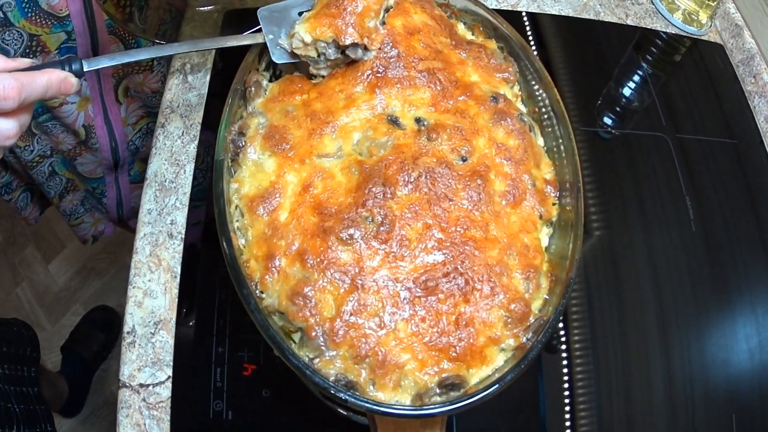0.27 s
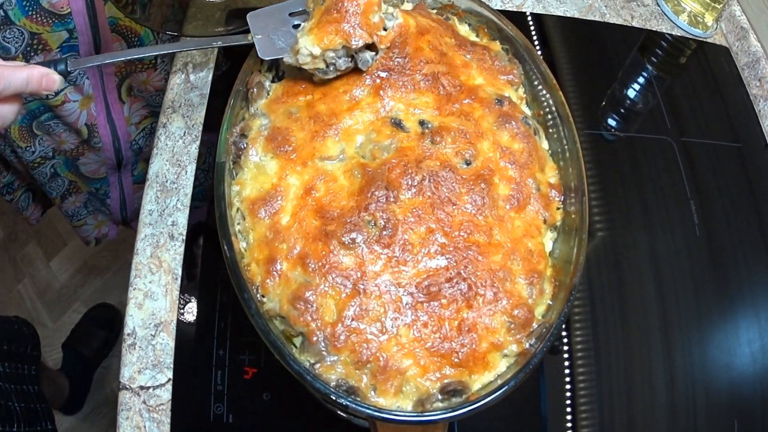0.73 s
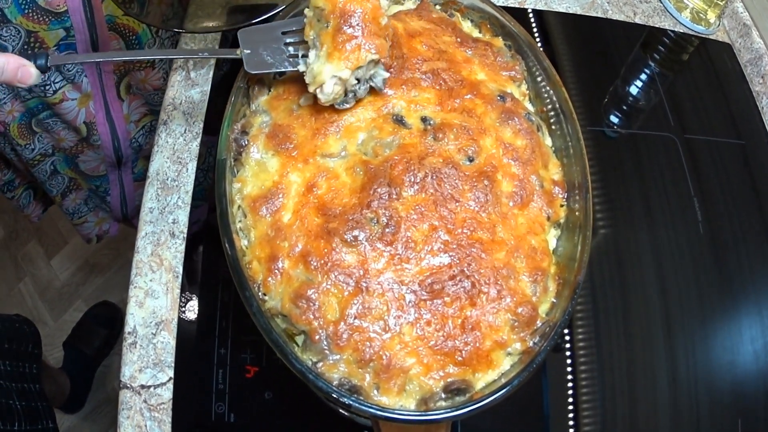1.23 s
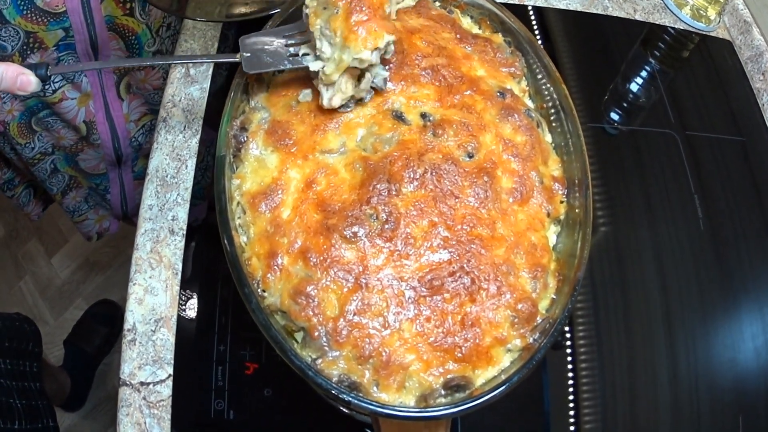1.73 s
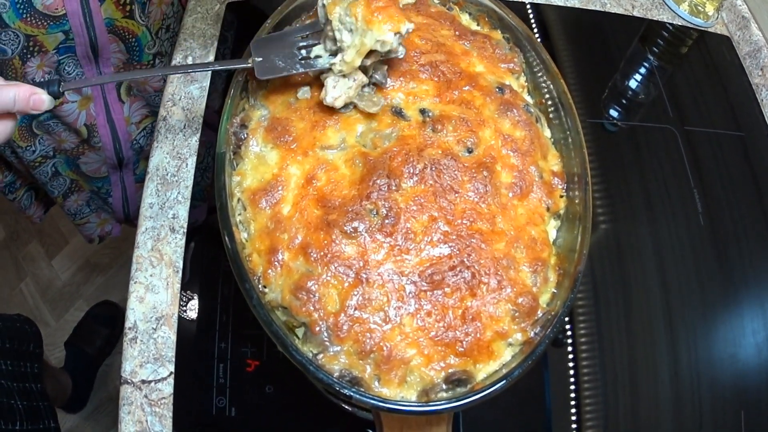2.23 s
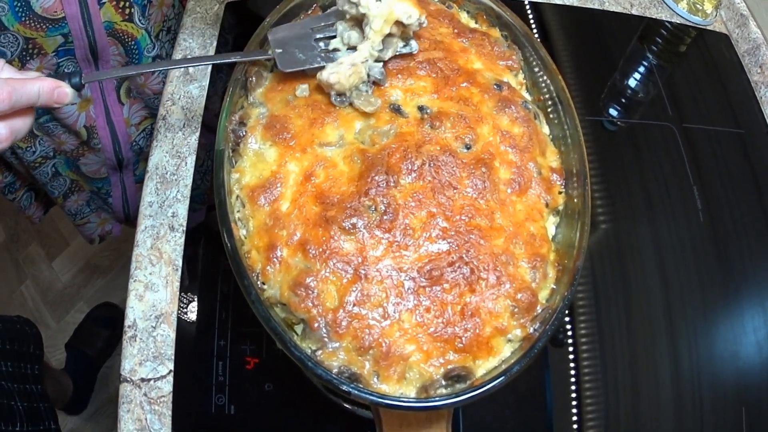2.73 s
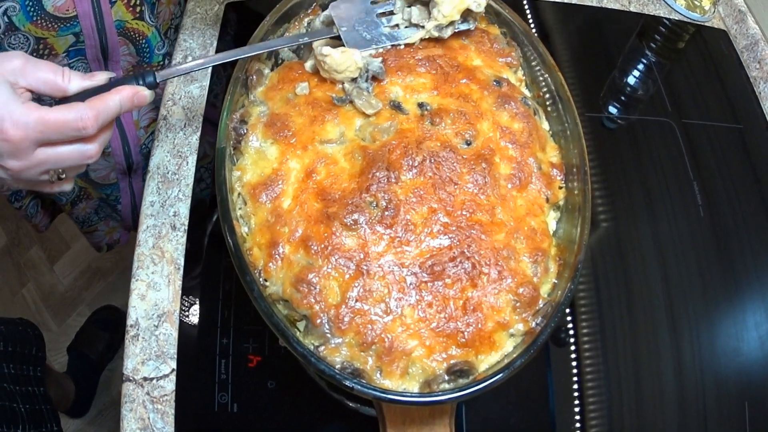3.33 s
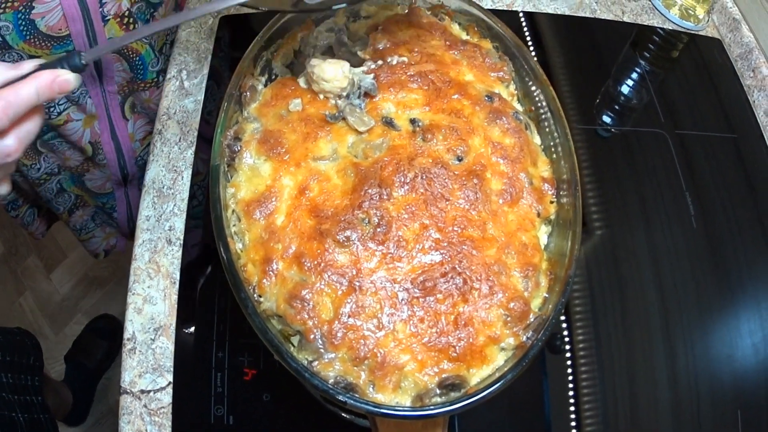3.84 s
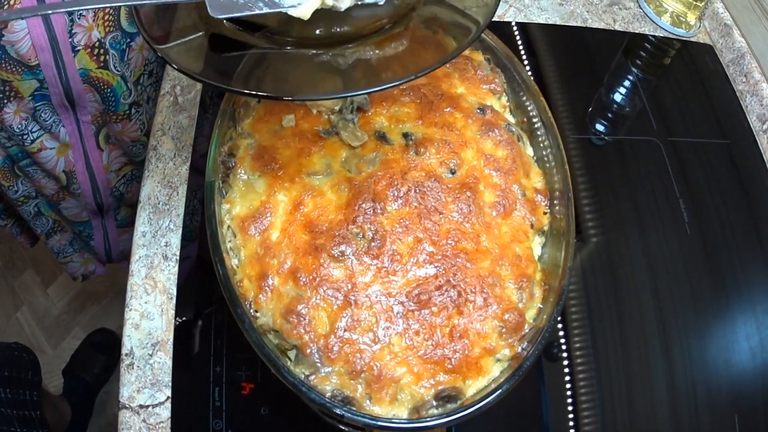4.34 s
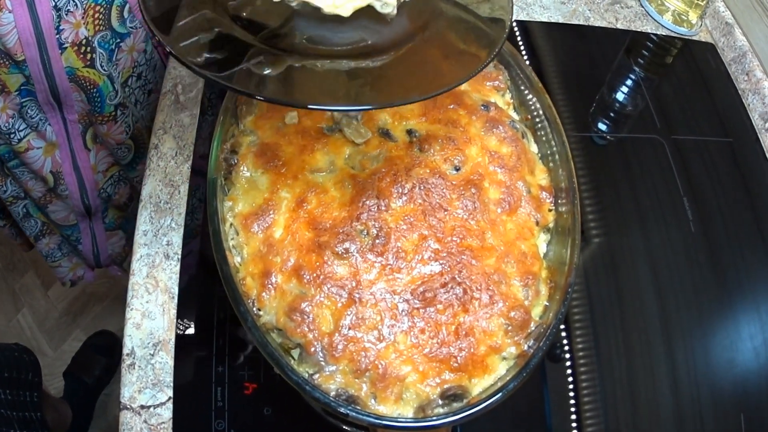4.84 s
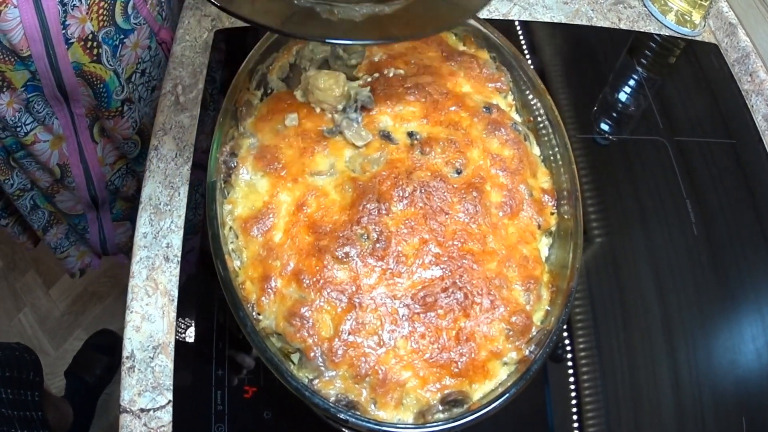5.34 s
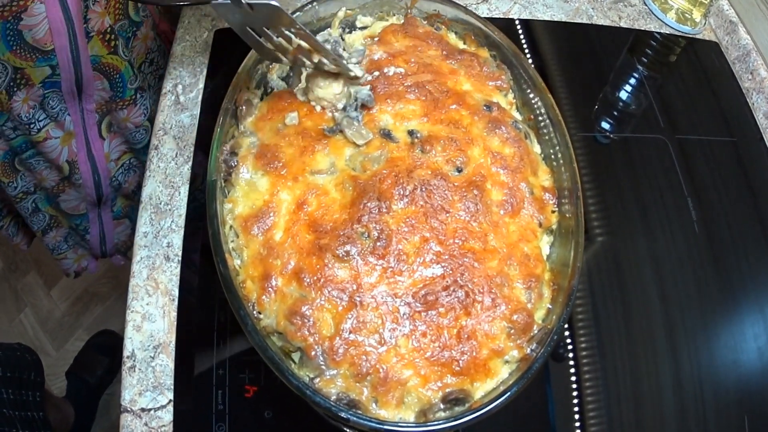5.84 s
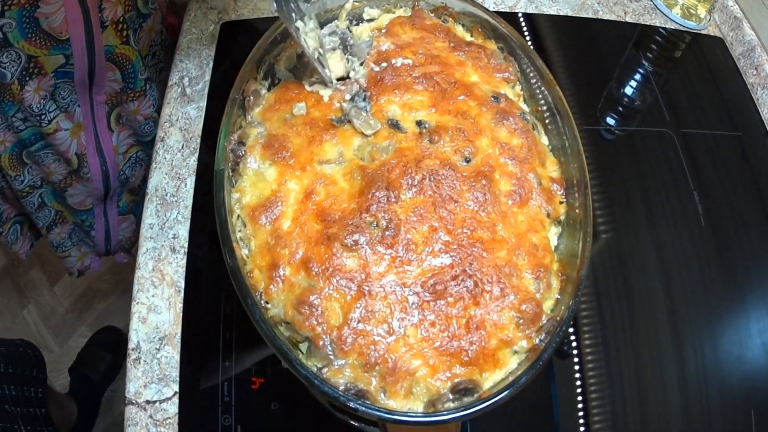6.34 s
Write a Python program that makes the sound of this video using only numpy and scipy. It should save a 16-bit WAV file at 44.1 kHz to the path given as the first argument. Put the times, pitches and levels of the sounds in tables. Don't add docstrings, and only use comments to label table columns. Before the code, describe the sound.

A metal spatula clinks, drops hard and scrapes in a glass baking dish, with tiny crust ticks, faint squeaks and late plate clinks in a kitchen.

```python
import sys
import numpy as np
from scipy import signal
from scipy.fft import rfft, irfft, next_fast_len
from scipy.io import wavfile
from scipy.ndimage import map_coordinates

SR = 44100
rng = np.random.default_rng(int(sys.argv[2]) if len(sys.argv) > 2 else 0)


def magnitude_from_level(level_db):
    exponent = np.asarray(level_db, float) / 20
    return 10 ** exponent


def unload_wav(signal):
    wavfile.write(
        sys.argv[1],
        SR,
        np.round(np.clip(np.atleast_2d(signal).T, -1, 1) * 32767).astype(np.int16),
    )


N = 290178
LENGTH = SR // 3
HARD_HZ, HEAVY_HZ = 2585, 1000


def unit(x):
    return x / np.sqrt(np.mean(x ** 2) + 1e-20)


def along(points, hz):
    f, v = np.transpose(sorted(points))
    return np.interp(np.log(hz + 1), np.log(f + 1), v)


def curve(rows):
    s, value = np.transpose(rows)
    return np.interp(np.arange(N) / SR, s, value)


def filtered(x, response):
    m = next_fast_len(x.shape[-1] + 8192)
    spectrum = rfft(x, m) * response(np.fft.rfftfreq(m, 1 / SR))
    return irfft(spectrum, m)[..., :x.shape[-1]]


def diffuse(pair, alike):
    def turn(hz):
        return np.arccos(np.clip(along(alike, hz), -1, 1)) / 2
    mid, side = filtered(pair, lambda hz: np.array([np.cos(turn(hz)), np.sin(turn(hz))]))
    return np.array([mid + side, mid - side])


# (frequency [Hz], phase [radians])
LEFT_LEAD = [(200, -.9), (400, -1), (2300, -.75), (3400, -.1), (6000, -.3), (11000, -.5)]
# (frequency [Hz], right over left [dB])
RIGHT_LOUDER = [(250, -1.3), (1000, 1), (2500, 3), (5000, 2.28), (9000, 0.3)]


def direct(x):
    def ports(hz):
        phase = [[.5j], [-.5j]] * along(LEFT_LEAD, hz)
        level_db = [[-.5], [.5]] * along(RIGHT_LOUDER, hz)
        return np.exp(phase) * magnitude_from_level(level_db)
    return filtered(x, ports)


# (frequency [Hz], time to fade 60 dB [s])
KITCHEN_FADE = [(200, 0.38), (1000, 0.37), (4000, 0.36), (10000, 0.19)]
# (frequency [Hz], left-right likeness [-1 to 1])
WALL_LIKENESS = [(200, 0.99), (1000, 0.55), (4000, .6), (10000, 0.43)]


def room(x):
    noise = rng.standard_normal((2, min(len(x), LENGTH)))
    hz, t, z = signal.stft(noise, SR, nperseg=256)
    fading = z * magnitude_from_level(-60 * t / along(KITCHEN_FADE, hz)[:, None])
    tail = diffuse(signal.istft(fading, SR, nperseg=256)[1], WALL_LIKENESS)
    late = np.pad(x, (130, 0))[None]
    return signal.fftconvolve(late, tail / np.linalg.norm(tail[0]), axes=1)[:, :len(x)]


def add(track, s, sound):
    part = track[:, round(s * SR):][:, :sound.shape[1]]
    part += sound[:, :part.shape[1]]


def strike(modes, colour, held_s, free_db, crack_db, wash_db, room_db, rise_s, sag=0, sag_s=0.0016, loose=1, hold=1):
    t = np.arange(LENGTH) / SR
    hz, db, t60 = np.transpose(modes)[:, :, None]

    fade = magnitude_from_level(-60 * (t / held_s) ** hold) + magnitude_from_level(free_db - 60 * t / t60)
    scatter_db = rng.normal(0, 1.3, hz.shape)
    strength = magnitude_from_level(db + along(colour, hz) + scatter_db)
    wander = np.cumsum(rng.standard_normal((len(modes), LENGTH)), axis=1)
    drift = 0.034 * np.sqrt(hz / 3000) * wander
    bent_t = t + sag * sag_s * (1 - np.exp(-t / sag_s))
    phase = 2 * np.pi * (hz * bent_t + loose * rng.random(hz.shape)) + drift
    ring = np.sum(strength * fade * np.sin(phase), axis=0)

    def clusters(f):
        return magnitude_from_level(-7) + np.sum(magnitude_from_level(db) / (1 + ((f - hz) / 55.27) ** 2), axis=0)
    noise = rng.standard_normal(LENGTH)
    crack = noise * magnitude_from_level(crack_db - 60 * t / (0.48 * held_s))
    wash = filtered(noise, clusters) * magnitude_from_level(wash_db + 4.5 - 60 * t / 0.23)
    (low_hz, low_db), high_db = colour[0], colour[-1][1]
    edges = [(120, -120), (0.96 * low_hz, low_db - 20), (12000, high_db - 18)]
    rough = filtered(crack + wash, lambda f: magnitude_from_level(along(colour + edges, f)) / (1 + f / 4000))

    blow = (ring + rough) * (1 - np.exp(-(t / rise_s) ** 2))
    return direct(blow) + magnitude_from_level(room_db) * room(blow)


# (frequency [Hz], level [dB per Hz])
HISS_COLOUR = [(15, -68), (25, -45), (353, -3), (391, -4.5), (545, -1.5), (603, -1.5), (907, -0.5),
               (1030, -2.5), (1140, -1), (2050, -6.5), (2510, -8.5), (3770, -13), (11000, -19),
               (15700, -24.5), (22000, -120)]
# (frequency [Hz], left-right likeness [-1 to 1])
HISS_LIKENESS = [(60, 0.4), (200, -0.46), (700, -0.75), (1400, -0.71), (2700, -.45), (3800, 0.16),
                 (7000, 0.18), (11000, 0.86)]


def hiss():
    noise = filtered(rng.standard_normal((2, N)), lambda hz: magnitude_from_level(along(HISS_COLOUR, hz)))
    return magnitude_from_level(-59 + 5.0) * unit(diffuse(noise, HISS_LIKENESS))


def camera_jolt():
    u = np.arange(N) / SR / .002
    return magnitude_from_level(-42 + np.array([[-5], [3]])) * u * np.exp(1 - u)


# (frequency [Hz], level [dB], time to fade 60 dB [s])
DISH_MODES = [(502, 16, 0.2), (700, -12.5, .08), (910, 0, .1), (1124, -2, .25), (1250, -5, .2),
              (1460, -10, .25), (1690, -1.5, 0.099), (1768, -5, .2), (2010, -11, .2), (2180, -14.5, .2),
              (2365, -6, .1), (2550, -3, .3), (2590, 2, 0.3), (2930, -13, .2), (3386, -6, .2),
              (3473, 0.5, .2), (3585, -13, .25), (3860, -13.5, .2), (4250, -12, .2), (4372, -6, .2),
              (4490, -3, .14), (4560, -0.5, 0.15), (4700, -8, .15), (5060, -14, .2), (5630, -5, 0.3),
              (5700, 0, 0.36), (6525, -7, .25), (6990, 0, 0.35), (7770, -7, 0.15), (8430, -6, 0.2),
              (9380, -12, .12), (10150, -13, 0.076)]
# (time [s], level [dB], spot [0 lip, 1 rim, 2 wall, 3 floor],
# hardness [dB per octave above HARD_HZ], weight [dB below HEAVY_HZ])
CLINK_EVENTS = [(0.0017, -12.5, 0.59, 2, -9), (0.032, -33.5, .8, 3, -7.5), (0.3007, -30.5, 1.14, -4, -6),
                (0.3605, -51.5, 1.95, -1, 16), (0.616, -44.5, 1, 2, -2.5), (0.639, -25, 0.068, -0.3, -5),
                (0.8117, -34, 0.037, -13.5, 0), (0.895, -51.5, 1.44, -11, -5.5),
                (2.5691, -34, 2.28, -1.5, 14.5), (2.674, -42.5, 2.4, -7.5, 2.5), (2.8279, -44, 1.52, 2, 0),
                (3.2977, -60.5, 1.66, 5.5, 10), (6.177, -18, 2.6, 5.5, -12)]
FAMILY_HZ = [515, 910, 1120, 1690, 1770, 2585, 3386, 3473, 4380, 4560, 5680, 6490, 7000, 8400]
LIP_STRIKE = [-29.5, -5.5, -10.5, -10.5, 2, -15, -8.5, -9, -6, -6, -3, -9.5, -11, -8.5]
RIM_STRIKE = [-16, -4, -4.5, 0, -1.5, -7, -1.5, -4, 2.5, 1.5, -6.5, -14, -15.5, -14]
WALL_STRIKE = [-41, -10.5, 5, 3, -0.5, -10.5, -4, -4, -12, -13.5, -15.5, -32, -17, -35]
FLOOR_STRIKE = [-24.5, -37, -14, -15, -9.5, -13, 1, -5.5, -11, -11.5, -24, -19.5, -39, -26.5]


def clinks():
    out, hz = np.zeros((2, N)), np.array(FAMILY_HZ)
    families = list(zip(LIP_STRIKE, RIM_STRIKE, WALL_STRIKE, FLOOR_STRIKE))
    for s, db, spot, hardness, weight_db in CLINK_EVENTS:
        def at_spot(values):
            return np.interp(spot, range(4), values)
        struck_db = np.array([at_spot(family) for family in families])
        struck_db = struck_db + hardness * np.log2(np.maximum(hz / HARD_HZ, 1))
        struck_db = struck_db + weight_db * (hz < HEAVY_HZ)
        clink = strike(DISH_MODES, list(zip(hz, db + struck_db)), held_s=0.04,
                       free_db=at_spot([-26.5, -26, -20, -23.5]), crack_db=14,
                       wash_db=at_spot([-5, 0, -0.5, -5.5]), room_db=-11.5, rise_s=0.00088, hold=1.15)
        add(out, s, magnitude_from_level(5.0) * clink)
    return out


# (time [s], peak level [dB], frequency [Hz])
THREAD_SNAPS = [(0.132, -25, 3110), (.466, -43, 9470), (.489, -39, 3260), (0.495, -42.5, 5930),
                (0.783, -47, 7600), (.84, -42.5, 9500), (0.88, -42.5, 8900), (0.93, -37.5, 3150),
                (.97, -38, 3130), (.98, -42.5, 9600), (1.458, -49, 4000), (1.854, -35, 2930),
                (1.87, -24, 6400), (1.874, -35, 5900), (1.878, -45, 5900), (2.05, -43.5, 7900),
                (2.593, -44, 9600), (2.814, -40.5, 6440), (2.829, -28.5, 6260), (3.147, -40, 9100),
                (3.792, -44, 7900), (6.324, -51, 6490), (6.354, -43, 7800), (6.475, -43.5, 4860)]
# (time [s], peak level [dB], frequency [Hz])
CRUST_CRACKS = [(0.529, -41.5, 6790), (0.901, -40, 3240), (0.962, -44, 6400), (.998, -37, 5680),
                (1.01, -40, 8520), (1.12, -35, 2190), (1.126, -38.5, 4480), (1.212, -40.5, 3940),
                (1.22, -44, 3800), (1.316, -44, 3450), (1.32, -45.5, 9000), (1.696, -39.5, 4500),
                (1.8673, -28, 7600), (2.777, -42, 3500), (2.945, -54.5, 3020), (3.041, -44.5, 3500),
                (2.207, -41, 8480), (2.546, -33, 7000), (2.829, -59, 7500), (3.158, -44.5, 6000),
                (3.28, -42, 3670), (3.299, -43.5, 1450), (4.464, -43, 2900), (4.578, -38, 4230),
                (5.605, -42, 6460), (6.068, -44, 8500), (6.433, -47, 8540), (6.487, -38, 7670),
                (6.531, -46, 4650)]


def food_ticks():
    out, t = np.zeros((2, N)), np.arange(SR // 8) / SR
    for breaks, octaves in [(THREAD_SNAPS, 0.21), (CRUST_CRACKS, 0.48)]:
        for s, db, hz in breaks:
            burst = rng.standard_normal(len(t)) * magnitude_from_level(-60 * t / .007)
            band = filtered(burst, lambda f: np.exp(-(np.log2((f + 1) / hz) / octaves) ** 2 / 2))
            snap = magnitude_from_level(db) * band / np.abs(band).max()
            add(out, s, direct(snap) + magnitude_from_level(-7.5) * room(snap))
    return out


# (time [s], length [s],
# frequency [Hz], width [Hz], level [dB])
FAINT_SWELLS = [(3.86, 0.27, 4470, 50, -66.5), (3.855, 0.13, 1650, 300, -61), (4.33, .12, 920, 550, -61),
                (4.353, 0.098, 3500, 240, -65), (4.538, .035, 5480, 90, -69), (4.54, .035, 3100, 200, -68),
                (5.35, .07, 6700, 80, -70), (5.363, 0.065, 3400, 320, -65), (6.279, .03, 430, 71, -56),
                (3.025, 0.1, 5715, 90, -64), (3.03, 0.13, 4560, 60, -67), (3.36, 0.091, 3350, 160, -67),
                (1.5, 0.044, 810, 480, -52), (0.35, 0.05, 500, 40, -55), (.155, .025, 620, 200, -52),
                (1.76, .05, 700, 250, -58), (2.735, .075, 3473, 70, -60), (2.94, .085, 2585, 60, -62),
                (3.03, .04, 2585, 40, -57), (2.57, .07, 240, 50, -60), (5.478, .045, 400, 90, -59),
                (3.063, .03, 2585, 70, -50), (3.063, .03, 1790, 110, -50), (.252, .035, 3480, 110, -59),
                (1.872, .09, 5950, 150, -63), (3.15, .06, 2585, 50, -66)]


def faint_swells():
    out = np.zeros((2, N))
    for s, length, hz, width_hz, db in FAINT_SWELLS:
        noise = rng.standard_normal(SR // 3)
        band = unit(filtered(noise, lambda f: np.exp(-((f - hz) / width_hz) ** 2 / 2)))
        band = unit(band / (np.abs(signal.hilbert(band)) + .1) ** .6)
        swell = np.sin(np.pi * np.clip(np.arange(len(noise)) / SR / length, 0, 1))
        add(out, s, direct(magnitude_from_level(db) * swell * band))
    return out


# (frequency [Hz], level [dB], time to fade 60 dB [s])
HANDLE_MODES = [(237.5, -18.5, 0.23), (527, -11.5, 0.18), (904, 5, 0.027), (1310, -14, 0.055),
                (1613, -18, 0.027), (2100, -35, 0.027)]
# (time [s], peak level [dB])
HANDLE_KNOCKS = [
    (0.19, -23.5),
    (0.411, -27),
    (0.466, -44),
    (0.718, -35.5),
    (1.1, -34.5),
    (1.5183, -24),
    (1.907, -28.5),
    (2.532, -37.5),
    (5.494, -55.5),
]


def knocks():
    out = np.zeros((2, N))
    rebounds = [(s + 0.004134, db - 1.5) for s, db in HANDLE_KNOCKS]
    for s, db in HANDLE_KNOCKS + rebounds:
        colour = [(500, db), (1500, db + 2.4), (4000, db - 22.0)]
        knock = strike(HANDLE_MODES, colour, held_s=0.02, free_db=-6, crack_db=14, wash_db=-3,
                       room_db=-16.0, rise_s=.0006, sag=0.22, loose=.1)
        add(out, s - .0012, magnitude_from_level(-7.0) * knock)
    return out


# (frequency [Hz], level [dB per Hz])
SHAKE_COLOUR = [(15, -120), (30, -12.5), (60, -8), (120, -1.5), (200, -7.5), (400, -120)]
# (time [s], level [dB])
HAND_LEANS = [
    (1.45, -69.5),
    (1.569, -64),
    (1.8, -73),
    (2.56, -79),
    (2.66, -75.5),
    (2.8, -73),
    (2.95, -92),
    (3.9, -79),
]


def counter_shake():
    t = np.arange(N) / SR
    level = magnitude_from_level(-90)
    for s, db in [(s, db - 35) for s, db in HANDLE_KNOCKS] + HAND_LEANS:
        since = np.maximum(t - s, 0)
        level = level + magnitude_from_level(db + 4.0 - 60 * since / 0.31) * (1 - np.exp(-since / 0.0079))
    shake = unit(filtered(rng.standard_normal(N), lambda hz: magnitude_from_level(along(SHAKE_COLOUR, hz))))
    return magnitude_from_level([[-4], [3]]) * level * shake


# (frequency [Hz], level [dB], time to fade 60 dB [s])
BLADE_MODES = [(229, -8, 0.1325), (377, -30, .15), (507, 7, 0.15), (710, -6, 0.13), (706, -5, 0.15),
               (874, -8, 0.041), (912, -2.5, 0.06), (1141, -13.5, 0.45), (1345, -19, 0.49),
               (1361.3, -9.5, 0.34), (1566, -14, 0.13), (1784, -4.5, 0.21), (1814, -10.5, 0.15),
               (2046, -16, 0.24), (2118, -10.5, 0.28), (2190, -9, 0.15), (2530, -15, 0.43),
               (2778, -18, 0.47), (2920, -9.5, 0.15), (3036, -5, 0.34), (3070, -15.5, .12),
               (3460, -4.5, 0.12), (4170, -10, 0.28), (4670, -10, 0.094), (5500, -23.5, 0.28),
               (5830, -17.5, 0.2), (6330, -20.5, 0.37), (7600, -20.5, 0.17), (8000, -20.5, 0.075),
               (8880, -21, 0.062)]
# (time [s], level [dB], delay until flat [s], flat over edge [dB],
# weight of the edge below HEAVY_HZ [dB])
BLADE_DROPS = [
    (1.575, -7.5, 0.012, -12.5, -3.5),
    (1.806, -22.5, .011, -5, 4.5),
]
DROP_HZ = [450, 900, 2000, 3100, 5000]
EDGE_COLOUR = [-25.5, -4, -4.5, -5.5, -5]
FLAT_COLOUR = [-9, -2, 6, 0.5, -20]


def blade_drops():
    out = np.zeros((2, N))
    for s, db, later_s, flat_db, weight_db in BLADE_DROPS:
        edge = db + np.array(EDGE_COLOUR) + weight_db * (np.array(DROP_HZ) < HEAVY_HZ)
        flat = db + flat_db + np.array(FLAT_COLOUR)
        for at, level in [(s, edge), (s + later_s, flat)]:
            blow = strike(BLADE_MODES, list(zip(DROP_HZ, level)), held_s=0.044, free_db=-14.0,
                          crack_db=0.0, wash_db=-2.7, room_db=-14.0, rise_s=0.0015)
            add(out, at - .0005, blow)
    return out


# (time [s], level [dB])
STROKE = [
    (2.62, -66.5),
    (2.662, -61),
    (2.68, -47),
    (2.79, -49),
    (2.86, -52.5),
    (2.95, -50),
    (3.02, -57),
    (3.075, -52.5),
    (3.3, -72),
]
# (time [s], level over the stroke [dB])
EDGE_SLIPS = [(2.696, 15.5), (2.733, 12), (2.754, 7), (2.786, 14), (2.812, 9), (2.847, 20), (2.889, 10.5),
              (2.912, 16), (2.944, 14), (2.979, 6), (3.002, 3.5), (3.031, 14), (3.042, 17), (3.067, 16),
              (3.077, 12), (3.112, 19), (3.15, 11), (3.21, 7.5)]
# (time [s], frequency [Hz])
LOWER_BEND = [(2.62, 1220), (2.8, 1134), (2.86, 1080), (2.89, 966.4), (3.051, 978), (3.12, 1017),
              (3.3, 920)]
HIGHER_BEND = [(2.62, 1660), (2.74, 1600), (2.78, 1980), (2.95, 1790), (3.05, 1694), (3.3, 1700)]


def scrape():
    t = np.arange(N) / SR
    slips_db = 0
    for s, db in EDGE_SLIPS:
        since = np.maximum(t - s, 0)
        slips_db = slips_db + db * np.exp(-since / 0.0062) * (1 - np.exp(-since / 0.00061))
    low_db = curve(STROKE) + slips_db

    travel_db = 89 * np.clip(t - 2.9, -.17, .17)
    bottom_db = low_db - 18 + travel_db
    high_db = low_db - (1 - 0.48) * slips_db - 22.5 - travel_db

    moving = np.clip((t - STROKE[0][0]) / 0.031, 0, 1) * np.clip((STROKE[-1][0] - t) / 0.13, 0, 1)
    clumps = map_coordinates(rng.standard_normal(int(N * 70 / SR) + 4), [t * 70])
    catches = 0.26 + (rng.random(N) < .01) * 3
    grains = rng.standard_normal(N) * magnitude_from_level(3.4 * clumps) * catches

    out = 0
    for db, path, width_hz in [(low_db, LOWER_BEND, 65), (low_db - 7.5, HIGHER_BEND, 90)]:
        turning = np.exp(2j * np.pi * np.cumsum(curve(path)) / SR)
        down = grains * turning.conj()
        ringing = filtered(np.array([down.real, down.imag]), lambda f: 1 / (1 + 1j * f / width_hz))
        swing = ringing[0] + 1j * ringing[1]
        steady = swing / (np.abs(swing) + 1e-9) ** 0.58
        out = out + magnitude_from_level(db) * moving * unit((turning * steady).real)

    bands = [(low_db - 12.5, 1600, 2300), (bottom_db, 2400, 2800), (high_db, 3000, 5200), (high_db - 5, 5200, 6000)]
    for db, lo, hi in bands:
        group = [mode for mode in DISH_MODES if lo < mode[0] < hi]

        def body(f):
            damping = 1j * f * 95
            return sum(magnitude_from_level(g) * (damping / (c * c - f * f + damping)) ** 2 for c, g, _ in group)
        out = out + filtered(magnitude_from_level(db) * moving * grains, body) / np.std(filtered(grains, body))
    return magnitude_from_level(-5.5) * (direct(out) + magnitude_from_level(-5.5) * room(out))


# (frequency [Hz], level [dB], time to fade 60 dB [s])
PLATE_MODES = [(213.6, -2.5, 0.51), (287, -9.5, 0.37), (369, 1, 0.16), (617, -25, 0.39), (785, 0, 0.1),
               (1255, -14, 0.13), (1820, -27.5, 0.42), (2980, 5, 0.14), (3030, -18, 0.18),
               (4134, -15, 0.14), (4772, -5.5, 0.061), (5498, -15.5, 0.076), (6060, -17, 0.1),
               (6800, -14.5, 0.059), (7182, -20, .06), (7600, -16, 0.09), (7394, -11, 0.12),
               (7900, -17, 0.06), (8460, -15, 0.1), (8700, -17, 0.12), (9400, -21, 0.16),
               (10420, -22, 0.12)]
# (time [s], level [dB], weight near 400 Hz [dB], level near 1.9 kHz [dB],
# free ring [dB])
SPOON_LANDINGS = [
    (4.464, -48.5, -35, 16, -14.5),
    (4.575, -40, -62.5, 11.5, -16.5),
    (5.9965, -33, -1, 14, -5),
    (6.023, -40, 7, 4.5, -2.5),
]
LANDING_HZ = [400, 1900, 6000]


def spoon_on_plate():
    out = np.zeros((2, N))
    low_hz, middle_hz, top_hz = LANDING_HZ
    for s, db, low_db, middle_db, free_db in SPOON_LANDINGS:
        top_db = 6.5 + 0.14 * low_db
        colour = [(low_hz, db + low_db), (middle_hz, db + middle_db), (3000, db), (top_hz, db + top_db)]
        landing = strike(PLATE_MODES, colour, held_s=0.017, free_db=free_db, crack_db=3, wash_db=-3.5,
                         room_db=-10.5, rise_s=0.0027)
        add(out, s - .0005, landing)
    return out


def scene():
    near = clinks() + food_ticks() + faint_swells() + knocks() + blade_drops() + scrape() + spoon_on_plate()
    airborne = filtered(near, lambda hz: (1j * hz / (1j * hz + 120)) ** 3)
    return airborne + hiss() + camera_jolt() + counter_shake()


def band_limit(x):
    return signal.sosfilt(signal.butter(12, 15910, fs=SR, output="sos"), x)


def record(dry):
    limited = filtered(dry, lambda hz: 1 / (1 + (hz / 11037) ** 160) + magnitude_from_level(-35))
    return band_limit(np.clip(limited, -1, 1))


dry = scene()
out = record(dry)
unload_wav(out)
```